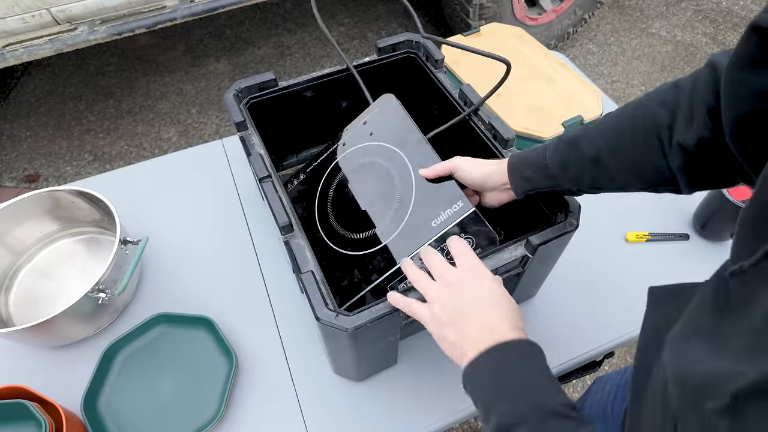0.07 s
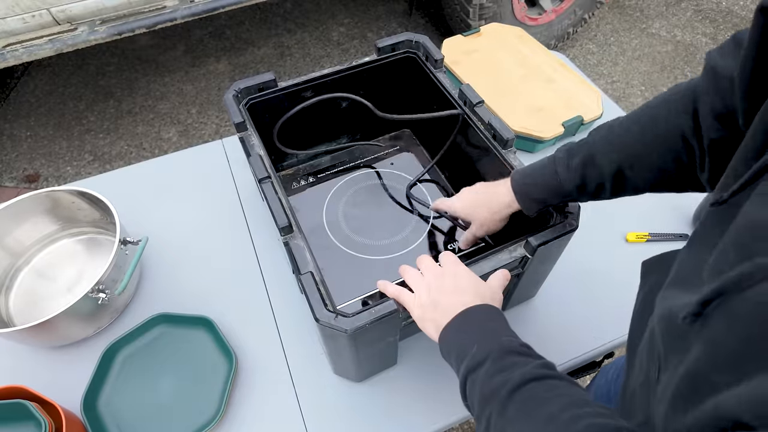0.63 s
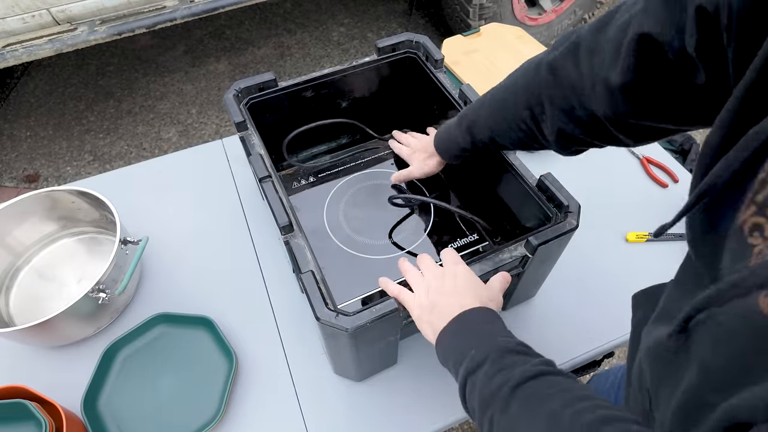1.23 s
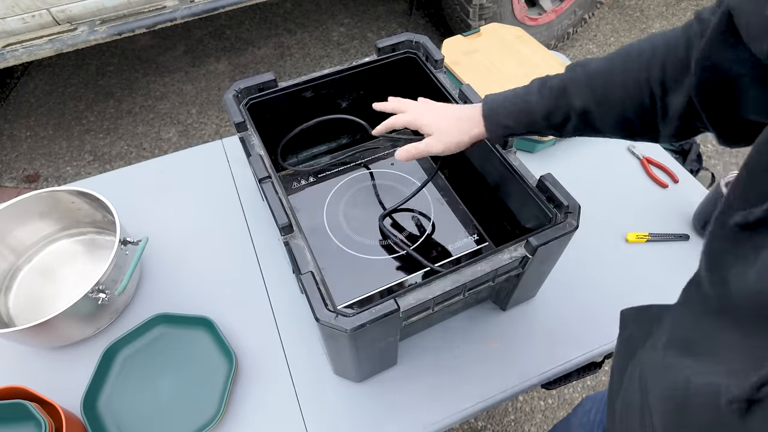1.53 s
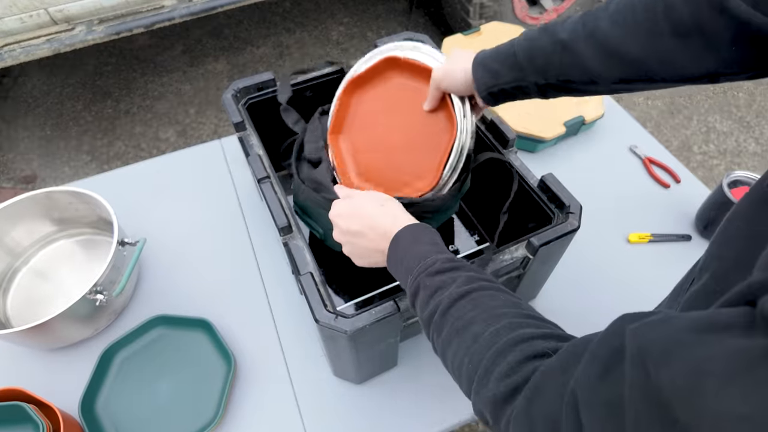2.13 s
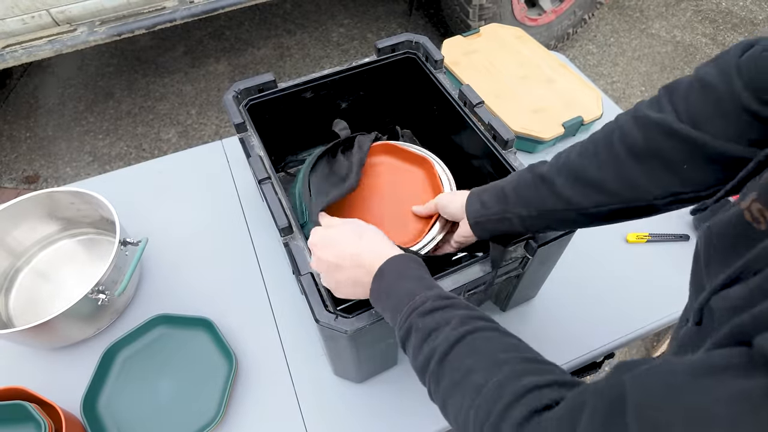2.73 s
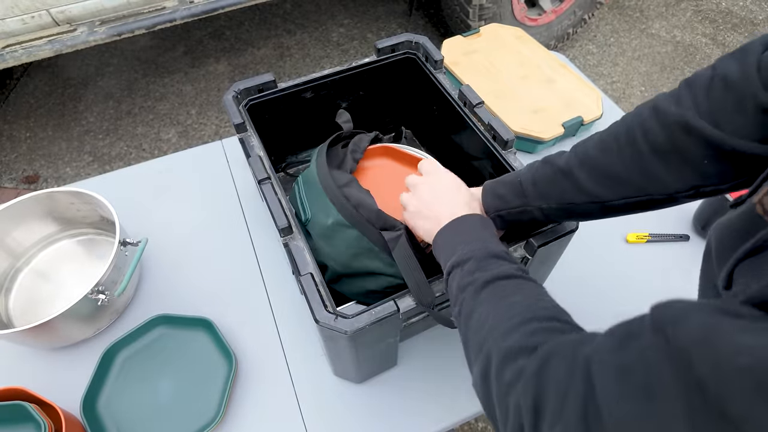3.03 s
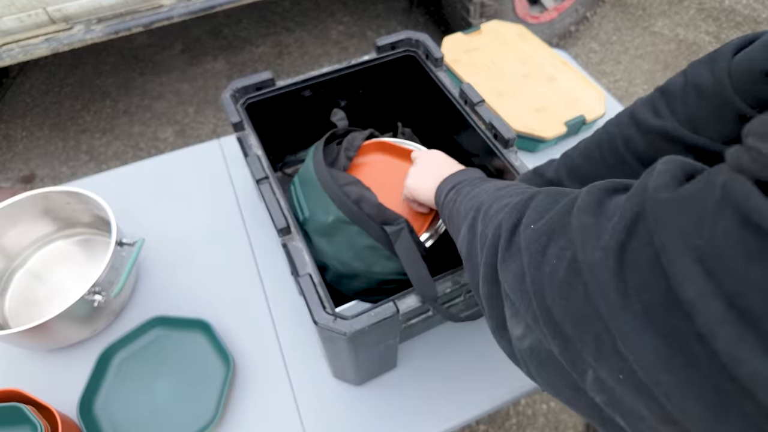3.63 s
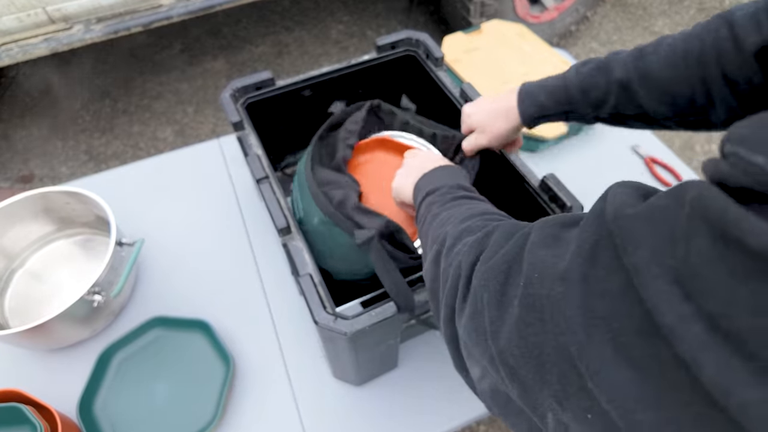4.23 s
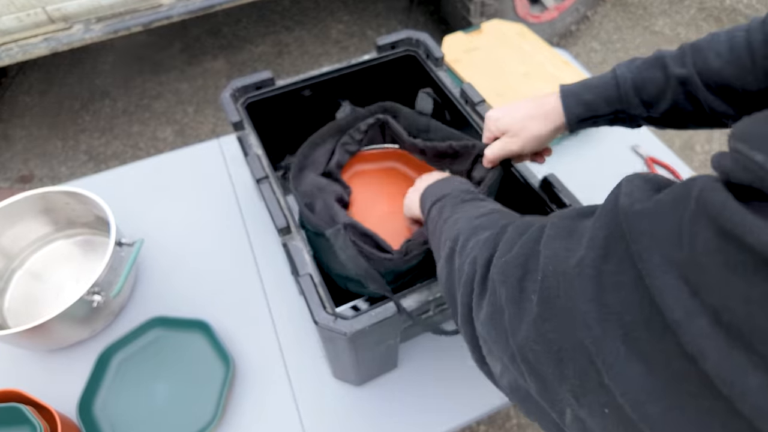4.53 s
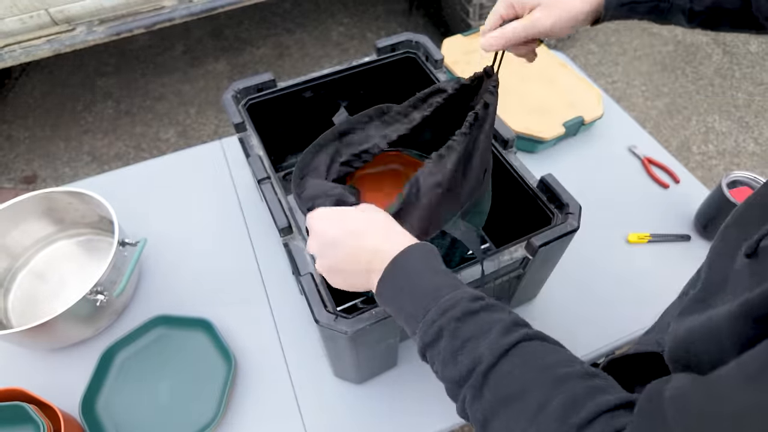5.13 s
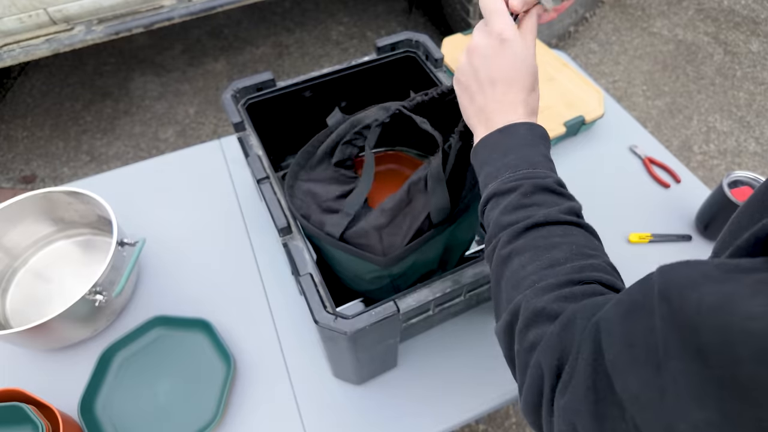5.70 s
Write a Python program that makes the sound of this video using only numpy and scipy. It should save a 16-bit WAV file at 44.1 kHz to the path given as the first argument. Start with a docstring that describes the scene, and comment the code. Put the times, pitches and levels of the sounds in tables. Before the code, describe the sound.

Close hollow knocks on a plastic box being packed, with brief rattles of pots and plates, scraping and cloth rustle.

```python
"""Packing the camp kitchen

Outdoors at a folding table, one microphone close to a plastic storage box. A hob settles in, its
cable and plug knocking on the walls and its glass top. A cloth bag of nested steel pots and plates is
lowered in and shoved into place with a clatter, and its drawstring rasps shut. Behind it lie quiet
open air and a faint high warble, probably a far bird."""
import sys
import numpy as np
from scipy import signal
from scipy.fft import rfft, irfft
from scipy.io import wavfile

SR = 44100
rng = np.random.default_rng(int(sys.argv[2]) if len(sys.argv) > 2 else 0)


def transcribe(u):
    """Save the signal u as a 16-bit wav file named by the first command-line argument.

    u: samples, shape (n,) or (channels, n), limited to [-1, 1]; the rate is SR.
    q: integer samples, one column per channel.
    """
    v = np.clip(np.atleast_2d(u).T, -1, 1)
    q = np.round(v * 32767).astype(np.int16)
    wavfile.write(sys.argv[1], SR, q)


N = 262836
TIME = np.arange(N) / SR
AGE = TIME[:SR // 3]   # seconds since a blow

# spectrum of rubbing and crinkling cloth: f/Hz, level/dB
CLOTH_SPECTRUM = [(1100, 13), (1600, -7.5), (1900, -0.5), (2600, -2), (2900, -1.5), (3400, 2), (4100, -8),
                  (4700, -4), (5400, -6), (6500, -3), (7300, -7), (8500, -12), (11000, -19), (15500, -25)]


def knocks(wall_trim_db=-5.5, thump_trim_db=-1.5, crack_trim_db=-2.0, bag_in_s=2.0):
    """Each blow on the box rings the walls, thumps the floor and cracks at the point of contact."""
    # blows: t/s, level/dB, wall f/Hz, nominal wall t60/s, relative jab/dB, thump/dB, crack/dB, crack f/Hz
    blows = [(0.002, -25, 480, 0.065, -5, -9.5, -16, 3020), (0.066, -27, 110, 0.1, 9, -6, -52, 1300),
             (0.159, -28, 488, 0.18, -1, -17, -26, 1300), (0.169, -26, 389, 0.045, 3, -6.5, -49, 1300),
             (0.317, -36.5, 373, 0.058, -14, -10, -23, 2540),
             (0.333, -29, 751, 0.14, -10, -10.5, -21.5, 2580),
             (0.414, -28.5, 506, 0.061, -23, -19, -16.5, 3450),
             (0.435, -29, 439, 0.1, -24, -10, -16.5, 1930), (0.519, -35.5, 480, 0.072, -15, -1, -32, 2870),
             (0.554, -32, 406, 0.041, 6, -26, -25, 1290), (0.574, -21, 684, 0.058, -9.5, -16, -16, 3500),
             (0.728, -34, 562, 0.1, -2, -18, -22.5, 2820), (0.955, -27, 453, 0.036, -27, -4, -11, 2550),
             (0.971, -30.5, 440, 0.055, -29, -5, -19, 2640), (1.003, -33, 336, 0.13, 5.5, -11, -28, 1320),
             (1.113, -17.5, 538, 0.069, -3.5, -7.5, -17.5, 3200),
             (1.152, -44, 200, 0.092, -4, 6.5, -30, 1400), (1.198, -35, 500, .07, 4, -19, -18.5, 4200),
             (1.278, -37.5, 504, 0.061, -16, -5, -22, 1850),
             (1.349, -36.5, 470, 0.056, -12, -11, -21.5, 1860),
             (1.385, -28, 562, 0.089, -18, -19, -12, 1970), (1.509, -20, 898, 0.04, -0.5, -26, -20, 1860),
             (1.513, -17, 565, 0.062, -8.5, -18.5, -23.5, 1810),
             (2.094, -28, 323, 0.34, -9, -10, -22, 3980), (2.117, -26, 580, 0.085, 14, -13.5, -20.5, 3600),
             (2.211, -30, 474, 0.089, -21, -13, -28, 1300), (2.233, -28.5, 1317, 0.033, -3, -19, -20, 1660),
             (2.235, -23, 445, 0.069, -32, -19.5, -29, 1470),
             (2.307, -30.5, 600, 0.11, -17, -13, -24, 1310), (2.319, -25, 610, 0.033, -6, -30, -25, 1750),
             (2.334, -28.5, 882, 0.05, -1, -10.5, -17, 3050),
             (2.340, -22, 717, 0.039, 8.5, -30, -24.5, 3050), (2.509, -34.5, 624, 0.05, -9, -30, -13, 1300),
             (2.528, -26, 632, 0.034, -5, -9.5, -31, 1300), (2.542, -16, 431, 0.13, 11, -19.5, -50, 1300),
             (2.57, -31, 670, 0.051, 1, -29, -16, 1290), (2.604, -14.5, 520, 0.12, 1.5, -40, -29, 1600),
             (2.626, -25, 562, 0.11, -5, -34, -17.5, 1360), (2.640, -25, 490, 0.084, -2, -19.5, -25, 3200),
             (2.658, -31, 415, 0.07, 0, -25, -11, 1910), (2.703, -27.5, 715, 0.15, -26, -29, -34, 1390),
             (2.736, -16.5, 497, 0.052, 8.5, -18, -34, 1310), (2.757, -33.5, 730, 0.079, -7, -9, -14, 2470),
             (2.779, -33.5, 490, 0.11, -6, -13, -21, 1410), (2.845, -41, 550, 0.072, -7, -22, -23, 1300),
             (2.905, -23, 680, 0.076, -5, -13.5, -23, 1340), (2.912, -18, 662, 0.078, -9, -30, -21, 1600),
             (2.948, -26.5, 650, 0.076, -5, -6.5, -17, 1320),
             (2.968, -31.5, 556, 0.088, -9, -10, -17, 1350), (3.017, -42, 459, 0.16, -10, -26, -30, 1400),
             (3.067, -37, 468, 0.087, -10, -32, -21, 1400), (3.108, -40.5, 630, 0.053, -13, -32, -28, 1403),
             (3.124, -41, 664, 0.041, 13, -23, -35, 3350), (3.188, -34.5, 635, 0.064, 0, -44, -23, 1330),
             (3.274, -42.5, 640, 0.044, -6, -13, -30, 1400), (3.293, -38, 440, 0.068, -25, -22, -25, 2700),
             (3.518, -35.5, 524, 0.075, -7, -27, -40, 1310), (3.565, -48, 427, 0.098, -8, -14, -25, 1400),
             (3.738, -37.5, 340, 0.28, 10, -2.5, -43, 3000), (3.825, -39.5, 408, 0.12, 5, -8, -26, 1450),
             (4.004, -42, 338, 0.077, -18, -16, -20, 2130), (4.18, -33, 864, 0.043, -10, -33, -12.5, 3100),
             (4.196, -31.5, 413, 0.056, -4, -13, -18.5, 2390),
             (4.242, -36.5, 532, 0.17, -12, -23, -28, 2700),
             (4.261, -27.5, 565, 0.087, -31, -33, -24, 3500), (4.287, -29, 488, 0.12, -12, -13, -14, 3330),
             (4.375, -22.5, 355, 0.069, -5, -40, -11, 2900), (4.383, -17, 862, 0.12, -2, -28, -16.5, 2810),
             (4.392, -15.5, 648, 0.034, -27, -37, -16, 3000), (4.394, -18, 960, .09, 1.5, -35, -29, 2800),
             (4.406, -23, 365, 0.039, 10, -9, -15, 2950), (4.414, -22, 685, 0.055, 3, -24, -21, 2800),
             (4.444, -32, 567, 0.09, -10, -6, -17, 2900), (4.548, -25, 662, 0.031, -9, -23, -27, 1910),
             (4.594, -31.5, 397, 0.16, 0, -7.5, -29, 1280), (4.625, -35.5, 326, 0.17, 6, -9.5, -38, 1300),
             (4.666, -35, 382, 0.11, 4, -13, -45, 3020), (4.707, -35.5, 592, 0.046, -3, -31, -25.5, 2700),
             (4.753, -43.5, 342, 0.09, 11, -15, -34, 2700), (4.935, -43, 560, 0.065, -15, -7.5, -29, 3370),
             (5.027, -51.5, 440, 0.093, -12, -8, -28, 2700), (5.12, -50.5, 590, 0.16, -14, -3, -8, 1300),
             (5.214, -45.5, 463, 0.062, -14, -17, -21, 3690), (5.612, -52.5, 415, 0.057, 3, -8, -25, 2700),
             (5.937, -41, 610, 0.076, 1.5, -15, -23.5, 1390)]
    out = np.zeros(N)
    for t, level, wall_hz, t60, jab_db, thump_db, crack_db, crack_hz in blows:
        boom_hz = 209.5 if t < bag_in_s else 253   # higher once the bag rests on the floor
        tick_db = -12.5 + 8 * np.log2(crack_hz / 2000)   # higher cracks tick more
        add(out, t, from_db(level + wall_trim_db) * box_walls(wall_hz, t60, jab_db))
        add(out, t, from_db(level + thump_db + thump_trim_db) * box_floor(boom_hz))
        add(out, t, contact(level + crack_db + crack_trim_db, crack_hz, tick_db))
    return out


def box_walls(pitch, t60, jab_db, focus_db=5.0, panel_db=-6.5, dull_db_per_octave=4.0):
    """The struck panel jabs and rings at a sagging pitch; the other walls join in, low modes longest."""
    # modes of the walls and what lies on them: f/Hz, level/dB
    modes = [(295, -4.5), (345, -34), (398, 3), (455, 3.5), (535, -3), (610, 0), (685, 6), (770, -0.5),
             (850, -0.5), (945, -2.5), (1065, -4.5), (1190, -4), (1320, -8.5), (1480, -41)]
    hz, db = np.transpose(modes)
    loaded_hz = hz * (1 + 0.025 * rng.standard_normal(len(hz)))   # the shifting load detunes the walls
    softness_db = dull_db_per_octave * np.maximum(np.log2(hz / pitch), 0)
    struck_db = db - softness_db + focus_db * bump(hz, pitch, octaves=0.11)
    others = ring(loaded_hz, struck_db, t60 * (600 / hz) ** 0.49, spread_db=3.5)
    panel_hz = pitch * (1 + 0.24 * dying(0.032))   # starts sharp, sags as the contact relaxes
    turns = np.cumsum(panel_hz) / SR
    panel = attack_one(np.cos(2 * np.pi * turns) * (1 - dying(0.087)) * dying(t60 * 0.77))
    jab_cycles = 1.25 * from_db(0.19 * max(jab_db, 0))   # a strong jab lasts a little longer
    return attack_one(others + from_db(panel_db) * panel + from_db(jab_db) * jab(pitch, jab_cycles))


def jab(hz, cycles):
    """The struck panel gives way and springs back: a short pulse that peaks after `cycles` cycles."""
    progress = hz * AGE / cycles
    return attack_one(np.sin(2 * np.pi * hz * AGE) * progress ** 3 * np.exp(-3 * progress))


def box_floor(pitch, focus_db=10.0):
    """The floor of the box and the table top boom, most near one pitch."""
    # modes of floor and table: f/Hz, level/dB, t60/s
    modes = [(89, -15.5, 0.085), (124, -26, 0.032), (182.8, -2.5, 0.067), (211.2, -5.5, 0.061),
             (256.2, -5.5, 0.074)]
    hz, db, t60 = np.transpose(modes)
    return ring(hz, db + focus_db * bump(hz, pitch, octaves=0.26), t60, spread_db=-2.0)


def contact(db, pitch, tick_db):
    """Hard plastic cracks near one pitch and ticks in the high treble."""
    # spectra of the crack and of the tick: f/Hz, level/dB
    crack_spectrum = [(1200, -4), (1700, -9), (2200, -5.5), (3000, -7), (3700, -7.5), (4700, -11.5)]
    tick_spectrum = [(4600, 3), (6700, 5), (8500, -3), (11000, -14.5), (15500, -23)]
    crack = snap(crack_spectrum, t60=0.036, count=30, pitch=pitch, focus_db=10.0)
    tick = snap(tick_spectrum, t60=0.025, count=70)
    return from_db(db) * (crack + from_db(tick_db) * tick)


def pots(shimmer_db=-7.0, shimmer_t60=0.081, focus_db=13):
    """A jolt sets the nested pots chattering; each touch rings them, and the bag damps the ring."""
    # jolts: t/s, level/dB, rattle t60/s, freedom to ring/0-1, favoured f/Hz
    jolts = [(2.095, -41.5, 0.27, 0.14, 3400), (2.606, -44, 0.055, 0.1, 2740),
             (2.627, -44.5, 0.029, 0.54, 3350), (2.904, -40.5, 0.052, 0.3, 2830),
             (2.911, -40.5, 0.2, 0.4, 2800), (2.922, -43, 0.088, 0.9, 1840),
             (2.946, -40, 0.054, 0.75, 1770), (3.08, -49, 0.049, 0.4, 2830),
             (4.376, -29.5, 0.06, 0.76, 2750), (4.392, -39, 0.07, 0.8, 3260)]
    # modes of the steel pots and the plates in them: f/Hz, level/dB, free t60/s
    modes = [(262, 1, .35), (395, 4, .35), (570, 4, .3), (946, -2, .25), (1061, -3, .25), (1290, -3, .25),
             (1590, -7, .2), (1841, -6, .2), (2242, -7, .2), (2350, -7, .2), (2498, -6, .2),
             (2731, -1, .16), (2800, -3, .15), (2950, -5, .17), (3074, -6, .2), (3316, -4, .24),
             (3190, -2, .2), (3240, -3, .2), (3394, -4, .2), (3448, -2, .2), (3596, -4, .2),
             (3700, -6, .18), (4188, -12, .14), (4600, -5, .16), (4980, -9, .15), (5770, -6, .12),
             (6422, -6, .16), (6620, -6, .16), (6794, -6, .12), (7560, -7, .18), (8102, -9, .13),
             (9400, -14, .16)]
    # spectrum of their crowded weaker modes: f/Hz, level/dB
    shimmer_spectrum = [(900, 6), (1600, -6), (2200, -1.5), (3200, -8), (4800, -7.5), (6700, 0),
                        (8500, -7.5), (11000, -14), (15500, -27.5)]
    out = np.zeros(N)
    pot_hz, pot_db, pot_t60 = np.transpose(modes)
    for t, level, rattle_t60, freedom, pitch in jolts:
        hz, db = crowded(shimmer_spectrum, count=160)
        shimmer = ring(hz, db, np.full(len(hz), shimmer_t60), spread_db=7.0)
        favoured_db = focus_db * freedom * bump(pot_hz, pitch, octaves=0.2)
        tones = ring(pot_hz, pot_db + favoured_db, pot_t60 * freedom, spread_db=-5.0)
        steel = freedom * tones + from_db(shimmer_db) * shimmer
        touches = chatter(rattle_t60, per_s=500, first=1.54)
        add(out, t, from_db(level) * attack_one(signal.fftconvolve(touches, steel)))
    return out


def plates():
    """Three loose plates jangle in their stack; each chatters on its own and rings a little differently."""
    # jangles: t/s, level/dB, rattle t60/s
    jangles = [(2.096, -43.5, 0.18), (2.135, -49, 0.21)]
    # clustered modes of plates almost the same size: f/Hz, level/dB, t60/s
    modes = [(2572, -4, .13), (3012, -5, .1), (3120, -4, .12), (3163, -2, .12), (3248, -3, .14),
             (3365, -1, .16), (3402, 1, .17), (3560, -5, .1), (3641, -4, .1), (3724, -4, .1),
             (3941, -1, .15), (4005, -3, .14), (4110, -8, .1), (4260, -7, .1), (4491, -3, .16)]
    out = np.zeros(N)
    hz, db, t60 = np.transpose(modes)
    for t, level, rattle_t60 in jangles:
        stack = 0
        for _ in range(3):
            touches = chatter(rattle_t60, per_s=600, first=2.1)
            stack += signal.fftconvolve(touches, ring(hz, db, t60, spread_db=3.0))
        add(out, t, from_db(level) * attack_one(stack))
    return out


def glass_top():
    """The plug and the box rim clack on the hob's glass top, which rings briefly."""
    # clacks: t/s, level/dB
    clacks = [(0.575, -41), (0.956, -44), (1.113, -37.5)]
    # modes of the glass: f/Hz, level/dB, t60/s
    modes = [(2180, -12, .08), (2560, 0, 0.035), (3110, -2, 0.033), (3135, -5, 0.066), (3460, -9, 0.038),
             (3840, 3, 0.018), (4140, 1, 0.03), (4520, 1, 0.025), (5060, -1.5, 0.025)]
    out = np.zeros(N)
    hz, db, t60 = np.transpose(modes)
    for t, level in clacks:
        add(out, t, from_db(level) * ring(hz, db, t60, spread_db=3.0))
    return out


def clicks(crack_trim_db=-4.5):
    """Cable, plug and cord stop tap and skid on the box; higher taps tick more and move the walls less."""
    # taps: t/s, level/dB, f/Hz, skid t60/s
    taps = [(0.101, -48, 2600, 0.13), (0.18, -59.5, 3000, 0.02), (0.254, -53, 1630, 0.03),
            (0.345, -51, 2600, 0.026), (0.477, -58, 3800, 0.015), (0.497, -71, 3300, 0.016),
            (0.512, -57, 5200, 0.024), (0.532, -54, 5000, .03), (0.828, -66, 3350, 0.016),
            (1.016, -57.5, 7200, 0.027), (1.238, -59.5, 1270, 0.026), (1.457, -58.5, 1530, 0.066),
            (1.484, -63, 4200, 0.027), (2.336, -51.5, 3180, 0.014), (2.35, -52.5, 4170, .012),
            (2.443, -46.5, 3030, 0.072), (2.659, -48, 2000, 0.006), (2.854, -58, 3350, 0.023),
            (3.404, -59, 5260, 0.061), (4.062, -47, 3100, 0.0073), (4.14, -51, 2870, 0.038),
            (4.859, -72, 4570, 0.04), (4.874, -66.5, 4600, 0.034)]
    out = np.zeros(N)
    for t, level, pitch, skid_t60 in taps:
        octaves = np.log2(pitch / 2000)
        tick_db = -9.5 + 8.5 * octaves
        wall_db = 7.0 - 8.0 * octaves
        skid = chatter(skid_t60, per_s=2500, first=1, age=AGE[:SR // 20])
        skid /= np.linalg.norm(skid)
        add(out, t, signal.fftconvolve(skid, contact(level + crack_trim_db, pitch, tick_db)))
        add(out, t, from_db(level + wall_db) * box_walls(pitch=560, t60=0.029, jab_db=-8.5))
    return out


def groans(waver=0.0423, octave_db=-20, rough_db=4.0):
    """Plates rub on the box: the plastic sticks and slips almost regularly in a short hollow groan."""
    # rubs: t/s, length/s, f/Hz, level/dB
    rubs = [(2.014, 0.052, 323.5, -46.5), (2.133, 0.072, 295.4, -37), (2.544, 0.02, 397.4, -25.5),
            (2.714, 0.03, 362, -28), (2.737, 0.052, 763, -34), (4.479, 0.021, 456, -31.5)]
    out = np.zeros(N)
    for t, length, pitch, level in rubs:
        phase = 2 * np.pi * np.cumsum(pitch * (1 + waver * drift(150))) / SR
        tone = np.sin(phase) + from_db(octave_db) * np.sin(2 * phase)
        out += from_db(level + rough_db * drift(200)) * arch(t, length) * tone
    return out


def handling(cloth_trim_db=-3.5, rock_trim_db=-2.5, crinkle_db=-8, sleeves_db=-80):
    """Gear drags in jerks over the plastic, cloth rubs on the pots, and the box rocks."""
    # spectra of the dragging gear and of the rocking box: f/Hz, level/dB
    drag_spectrum = [(190, 8), (270, 3), (320, 1.5), (390, 11.5), (460, 10), (540, 8.5), (700, 3), (880, 0),
                     (1100, -12), (1400, -19)]
    rock_spectrum = [(55, -3), (90, -3), (110, -1), (140, -6.5), (195, -3), (270, 7)]
    drag, cloth, rock = hand_strokes()
    jerks = from_db(2.5 * drift(70))
    weave = shifting_folds(colour(friction(per_s=1700, size_db=0.5, smooth=1.0), CLOTH_SPECTRUM))
    rustle = rms_one(weave + from_db(crinkle_db) * crinkles())
    scrape = colour(friction(per_s=440, size_db=0.0, smooth=0.99), drag_spectrum)
    rumble = colour(friction(per_s=220, size_db=2.5, smooth=0.59), rock_spectrum)
    rubbing = (cloth + from_db(sleeves_db)) * from_db(cloth_trim_db) * rustle   # faint between strokes
    rocking = rock * from_db(rock_trim_db) * rumble
    return jerks * (drag * scrape + rubbing + rocking)


def hand_strokes(swell_share=0.19):
    """Gains of dragging, rubbing and rocking: every stroke of the hands swells, holds and dies away."""
    # hob from 0 s, bag from 2 s, shove at 4.2 s, drawstring from 4.9 s
    # strokes: start/s, end/s, dragging/dB, rubbing/dB, rocking/dB
    strokes = [(0.0, 0.057, -42, -56.5, -36), (0.104, 0.312, -49.5, -55.5, -46.5),
               (0.306, 0.538, -45, -51.5, -40.5), (0.611, 0.72, -46, -61.5, -46),
               (0.933, 0.97, -54, -66.5, -55), (1.102, 1.18, -62, -65, -43),
               (1.304, 1.314, -48.5, -61, -77), (1.403, 1.52, -51.5, -63.5, -67),
               (1.969, 2.114, -61.5, -61, -60), (2.09, 2.195, -44, -51, -50.5),
               (2.24, 2.474, -46, -51, -55.5), (2.482, 2.768, -43.5, -46.5, -51),
               (2.794, 2.936, -58, -61.5, -68), (2.892, 3.308, -54, -55, -62),
               (3.308, 3.676, -55, -64.5, -68), (3.68, 4.05, -58.5, -63, -63),
               (4.05, 4.222, -52, -56.5, -60), (4.221, 4.37, -45, -43.5, -63),
               (4.361, 4.414, -31.5, -40, -43), (4.436, 4.481, -38, -51, -49),
               (4.517, 4.694, -48, -59, -43), (4.72, 4.88, -64.5, -74, -68),
               (4.902, 5.021, -58.5, -64, -63), (5.057, 5.221, -56, -62.5, -55),
               (5.244, 5.41, -68, -72, -72), (5.553, 5.662, -74, -77, -66), (5.892, 5.92, -57.5, -77, -78)]
    # release of dragging, rubbing and rocking: t60/s
    release_t60 = [0.21, 0.24, 0.46]
    gains = np.zeros((3, N))
    for start, end, *levels_db in strokes:
        swell_s = max(swell_share * (end - start), .005)
        swell = 1 - np.exp(-np.maximum(TIME - start, 0) / swell_s)
        release = dying(np.array(release_t60)[:, None], np.maximum(TIME - end, 0))
        gains += from_db(levels_db)[:, None] * swell * release
    return gains


def shifting_folds(x, patchy_db=1.5, per_s=28):
    """Folds and contact points move, so each part of the treble swells and fades on its own."""
    hz = np.fft.rfftfreq(N, 1 / SR) + 1
    spectrum = rfft(x)
    centres_hz = np.geomspace(1200, 14000, 14)
    shares = [np.interp(hz, centres_hz, one) for one in np.eye(len(centres_hz))]
    bands = [irfft(spectrum * share, N) for share in shares]
    return rms_one(sum(band * from_db(patchy_db * drift(per_s)) for band in bands))


def crinkles(per_s=280, t60=0.013):
    """Folds of stiff nylon and cable let go one by one, each a short rasp somewhere in the treble."""
    pitches = np.geomspace(2000, 8500, 8)
    out = np.zeros(N)
    for hz in pitches:
        folds = friction(per_s / len(pitches), size_db=2.5, smooth=0)
        rasp = snap(CLOTH_SPECTRUM, t60, count=60, pitch=hz, focus_db=14.5, octaves=0.38)
        out += signal.fftconvolve(folds, rasp)[:N] * from_db(at_hz(CLOTH_SPECTRUM, hz))
    return rms_one(out)


def swishes(treble_hz=4380, flutter_db=2.1):
    """Sleeves and bag brush past each other; the faster the cloth slides, the louder and fuller it is."""
    # brushes: t/s, length/s, level/dB, relative treble/dB
    brushes = [(3.218, 0.067, -58.5, -2), (3.408, 0.055, -67, 5.5), (3.5, 0.091, -71, 6.5),
               (3.636, 0.09, -70, -3), (3.746, 0.1, -62.5, -0.5), (3.83, 0.14, -68, -1),
               (3.952, 0.15, -61, 0.5), (4.425, 0.074, -45.5, -1.5), (4.687, 0.14, -71.5, -2),
               (4.942, 0.076, -74, 10.5), (5.078, 0.04, -69, 6.5), (5.154, 0.12, -64, -4),
               (5.303, 0.11, -67.5, -7), (5.548, 0.14, -69, -11), (5.86, 0.059, -73, 6.5)]
    # spectrum of sliding cloth: f/Hz, level/dB
    spectrum = [(1800, 1), (2600, 5.5), (3400, 2.5), (4300, -4.5), (5400, -2), (6600, 0.5), (8500, -8.5),
                (11000, -16), (15500, -20)]
    threads = colour(friction(per_s=1800, size_db=1.5, smooth=0.63), spectrum)
    threads *= from_db(flutter_db * drift(90))
    body = signal.sosfiltfilt(signal.butter(2, treble_hz, fs=SR, output="sos"), threads)
    treble = threads - body
    out = np.zeros(N)
    for t, length, level, treble_db in brushes:
        speed = arch(t, length)
        out += from_db(level) * (speed ** 1.6 * body + from_db(treble_db) * speed ** 0.88 * treble)
    return out


def drawstring():
    """The braided cord rasps through the hem with a faint pitch."""
    # resonances of the cord in its hem: f/Hz, width/Hz, level/dB
    resonances = [(2020, 450, -1), (2900, 600, -2), (3700, 700, -3), (4800, 1200, -5)]
    # pulls: start/s, end/s, level/dB
    pulls = [(5.08, 5.28, -72), (5.23, 5.55, -71.5), (5.51, 5.737, -73)]
    slips = friction(per_s=970, size_db=0.5, smooth=0.96)
    rasp = sum(from_db(db) * rms_one(signal.lfilter(*signal.iirpeak(hz, hz / width, SR), slips))
               for hz, width, db in resonances)
    return rms_one(rasp) * sum(from_db(db) * arch(start, end - start) for start, end, db in pulls)


def with_reflections(x, wet_db=-23, t60=0.5, dull_hz=3500, delay_s=0.015):
    """The direct sound reaches the microphone first, then dull scatter from box, table and ground."""
    tail = rng.standard_normal(len(AGE)) * dying(t60) * (AGE > delay_s)
    tail = signal.sosfilt(signal.butter(1, dull_hz, fs=SR, output="sos"), tail / np.linalg.norm(tail))
    return x + from_db(wet_db) * signal.fftconvolve(x, tail)[:N]


def far_bird(level_db=-82, warble_hz=200, warbles_per_s=20, quaver_hz=110, flicker_db=2.0):
    """Thin, far whistles waver in pitch and flicker on their way to the microphone."""
    # chirps: t/s, length/s, f/Hz
    chirps = [(1.56, 0.086, 7400), (1.66, 0.054, 7300)]
    out = np.zeros(N)
    for t, length, pitch in chirps:
        hz = pitch + warble_hz * np.cos(2 * np.pi * warbles_per_s * (TIME - t)) + quaver_hz * drift(900)
        gain = from_db(level_db + flicker_db * drift(200)) * arch(t, length) ** 2
        out += gain * np.sin(2 * np.pi * np.cumsum(hz) / SR)
    return out


def open_air(level_db=-62):
    """The steady low hush of the place."""
    # spectrum of the outdoor background: f/Hz, level/dB
    spectrum = [(22, -48), (55, -2), (100, -8), (200, -0.5), (430, -2.5), (760, -5.5), (1050, -11),
                (1400, -20.5), (2200, -25.5), (4500, -29.5), (8000, -36.5), (15500, -43)]
    return from_db(level_db) * colour(rng.standard_normal(N), spectrum)


def ring(hz, db, t60, spread_db, age=AGE):
    """Struck modes swell over about a cycle; the point of contact gives each its strength and sign."""
    gain = from_db(db + spread_db * rng.uniform(-0.8, 1, len(hz))) * rng.choice([-1, 1], len(hz))
    turns = hz[:, None] * age
    swell = 1 - np.exp(-turns)
    return attack_one(gain @ (np.sin(2 * np.pi * turns) * swell * dying(t60[:, None], age)))


def snap(spectrum, t60, count, pitch=3000, focus_db=0, octaves=0.26):
    """Quickly damped upper modes, lifted by focus_db near one pitch."""
    hz, db = crowded(spectrum, count)
    focused_db = db + focus_db * bump(hz, pitch, octaves)
    return ring(hz, focused_db, np.full(count, t60), spread_db=-7.5, age=AGE[:SR // 25])


def crowded(spectrum, count):
    """Unevenly spaced mode frequencies across a spectrum, and their levels."""
    low_hz, high_hz = spectrum[0][0], spectrum[-1][0]
    hz = low_hz + (high_hz - low_hz) * (np.arange(count) + rng.random(count)) / count
    return hz, at_hz(spectrum, hz)


def chatter(t60, per_s, first, age=AGE):
    """A first touch of strength `first` and a dying run of further ones."""
    touches = rng.standard_normal(len(age)) * (rng.random(len(age)) < per_s / SR) * dying(t60, age)
    touches[0] = first
    return touches


def friction(per_s, size_db, smooth):
    """Tiny slips of uneven size over a smooth hiss."""
    sizes = from_db(size_db * np.minimum(rng.exponential(1, N), 4)) * rng.choice([-1, 1], N)
    slips = sizes * (rng.random(N) < per_s / SR)
    return rms_one(slips) + smooth * rng.standard_normal(N)


def colour(x, spectrum):
    """Shape a steady sound by a spectrum that falls steeply beyond its ends."""
    hz = np.fft.rfftfreq(N, 1 / SR) + 1
    skirts = 1 / (1 + (spectrum[0][0] / hz) ** 6 + (hz / spectrum[-1][0]) ** 6)
    return rms_one(irfft(rfft(x) * from_db(at_hz(spectrum, hz)) * skirts, N))


def at_hz(spectrum, hz):
    """Read a spectrum's dB on a log-frequency axis."""
    knots, db = np.transpose(spectrum)
    return np.interp(np.log(hz), np.log(knots), db)


def bump(hz, pitch, octaves):
    """Weight 1 at a pitch, falling to both sides."""
    return np.exp(-.5 * (np.log2(hz / pitch) / octaves) ** 2)


def arch(start, length):
    """A rounded swell from silence to silence."""
    return np.sqrt(np.abs(np.sin(np.pi * np.clip((TIME - start) / length, 0, 1))))


def dying(t60, age=AGE):
    """Decay by 60 dB in t60 seconds, 3 ms at the shortest."""
    return np.exp(-np.log(1000) * age / np.maximum(t60, .003))


def drift(per_s):
    """A random wander with a spread near 1."""
    knots = rng.standard_normal(4096)
    return np.interp(TIME * per_s, np.arange(len(knots)), knots)


def from_db(db):
    """Decibels to gain."""
    return 10 ** (np.asarray(db) / 20)


def rms_one(x):
    """Scale to rms 1."""
    return x / np.sqrt(np.mean(x ** 2) + 1e-20)


def attack_one(x):
    """Scale a blow to rms 1 over its first 20 ms."""
    return x / np.sqrt(np.mean(x[:SR // 50] ** 2) + 1e-20)


def add(out, t, sound):
    """Lay a sound into a track at t seconds."""
    start = max(round(t * SR), 0)
    out[start:start + len(sound)] += sound[:N - start]


def scene():
    """Packing close by, over a quiet outdoor background, in mono."""
    air = open_air()
    impacts = knocks() + clicks() + glass_top() + pots() + plates()
    packing = with_reflections(impacts + groans()) + handling() + swishes() + drawstring()
    return (packing + far_bird() + air)[None]


def record(dry, low_cut_hz=55, high_cut_hz=15800):
    """The microphone thins the deep bass, and the top is cut steeply."""
    thin = signal.sosfilt(signal.butter(2, low_cut_hz, "high", fs=SR, output="sos"), dry)
    return signal.sosfilt(signal.ellip(10, .1, 80, high_cut_hz, fs=SR, output="sos"), thin)


dry = scene()
out = record(dry)
transcribe(out)
```